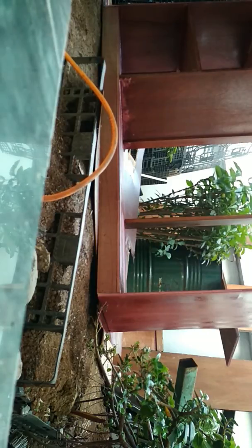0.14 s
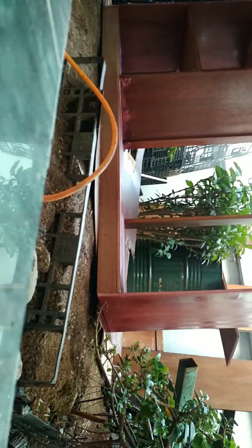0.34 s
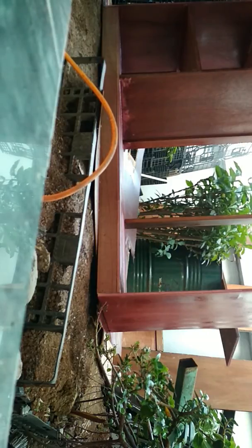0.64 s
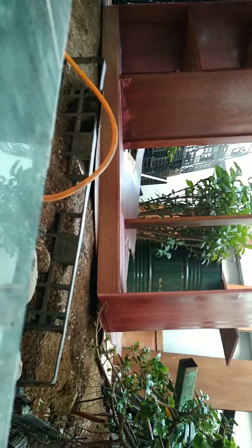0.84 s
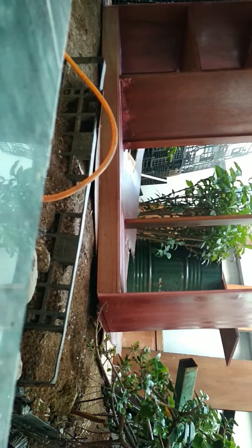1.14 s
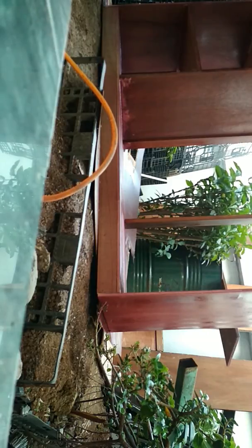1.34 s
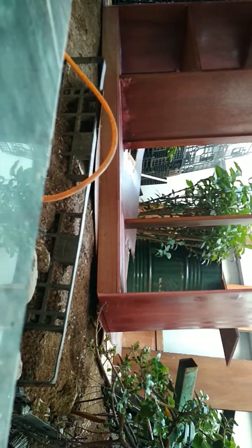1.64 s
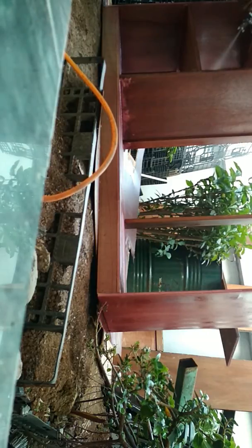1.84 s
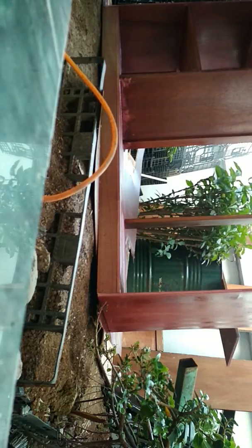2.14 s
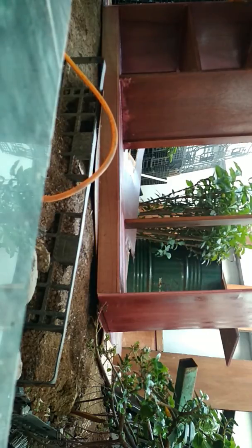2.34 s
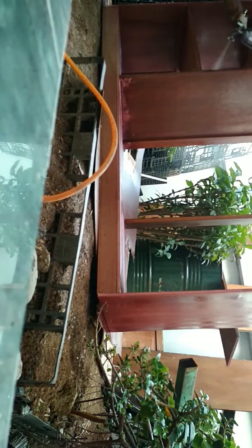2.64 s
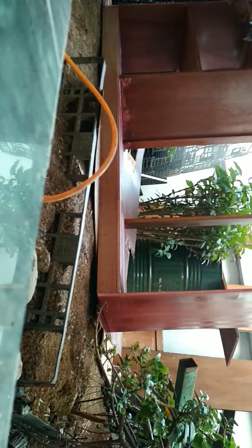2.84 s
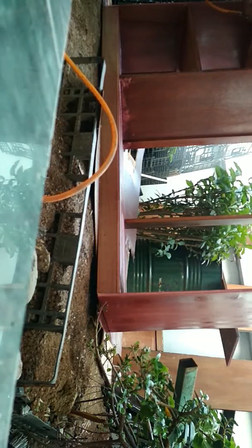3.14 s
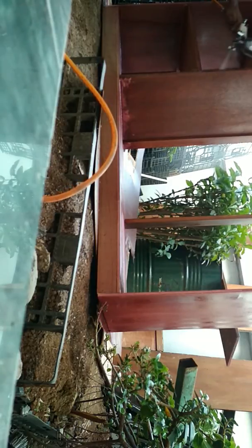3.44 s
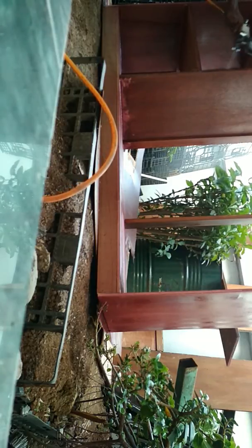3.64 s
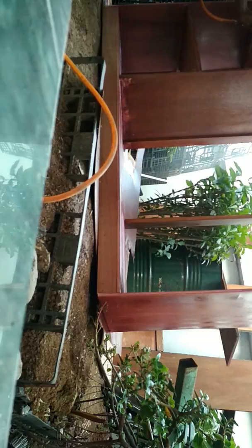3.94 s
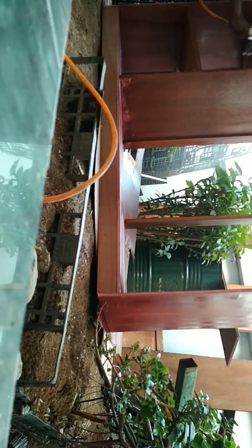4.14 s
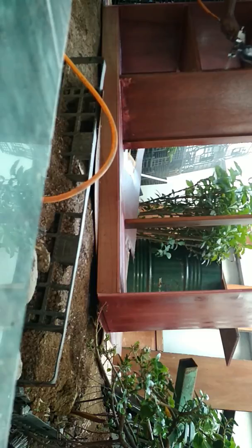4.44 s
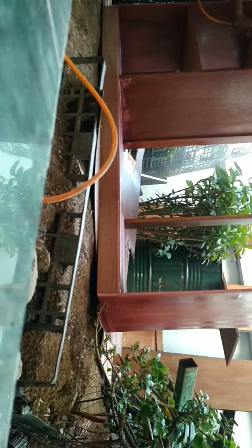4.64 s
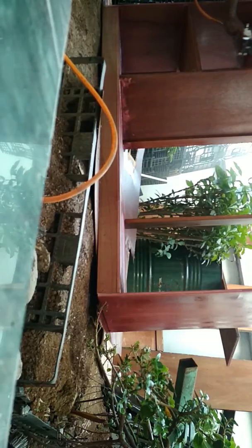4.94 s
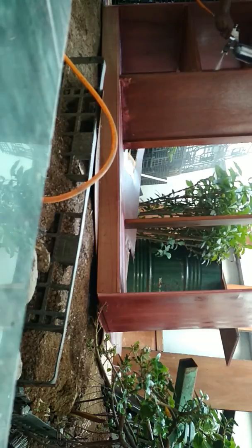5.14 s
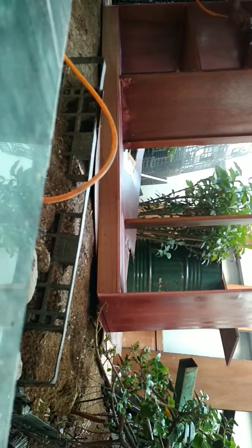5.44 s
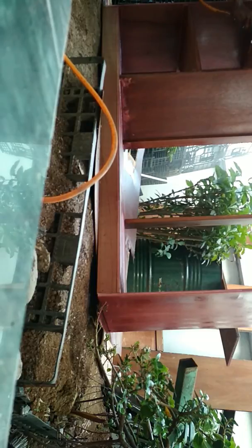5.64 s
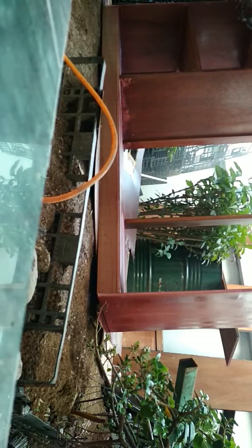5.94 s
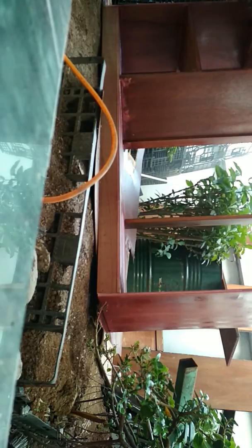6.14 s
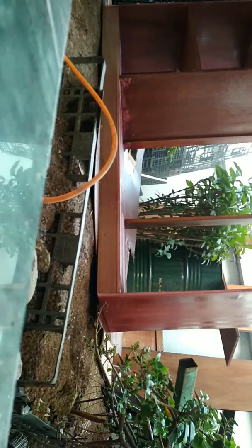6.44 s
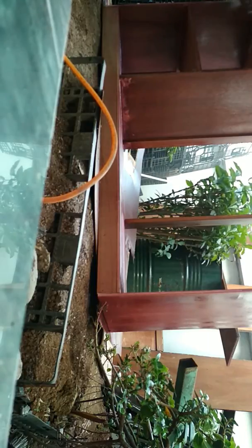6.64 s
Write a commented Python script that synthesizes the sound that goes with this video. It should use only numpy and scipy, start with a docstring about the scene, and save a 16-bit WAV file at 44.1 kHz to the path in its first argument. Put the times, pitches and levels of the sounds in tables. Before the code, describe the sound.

A steady motor-driven compressor putters about twenty-four times a second, its reed buzzing, valves knocking and air spitting in tiny sharp bursts, brighter on the right. Spray hiss with sputtering droplets opens the scene, cuts off, and returns late. Between the two sprays only the machine remains, with a small regular squeak that is clearest just after the first spray. The stereo microphone is nearby outdoors, catching soft wind rumble.

```python
"""A small piston air compressor runs steadily in a yard, right of the microphone, 24 strokes a second.
On each stroke its intake reed flutters as a gliding tone, valves clack and knock the tank's modes,
and bursts of noise spit air; a faint squeak comes round with the belt, over fan rush and motor tones.
A spray gun hisses twice as shaped noise with crackling droplets, and a light breeze rumbles on the microphone."""
import sys
import numpy as np
from scipy import signal
from scipy.fft import rfft, irfft, next_fast_len
from scipy.io import wavfile
from scipy.ndimage import map_coordinates

SR = 44100
rng = np.random.default_rng(int(sys.argv[2]) if len(sys.argv) > 2 else 0)


def unload_audio(sound):
    """Save the sound as a 16-bit wav file, at the path given as the first command line argument."""
    columns = np.transpose(np.atleast_2d(sound))
    # keep every value between -1 and 1, then stretch to whole-number steps
    steps = np.round(np.clip(columns, -1, 1) * 32767)
    wavfile.write(sys.argv[1], SR, steps.astype(np.int16))


N = 298557


def amp(db):
    """Decibels to gain."""
    return 10 ** (np.asarray(db) / 20)


def stereo_gain(left_db, right_db):
    """A column of gains for the left and right microphone ports."""
    return amp([[left_db], [right_db]])


def panned(right_db):
    """Gains that make the right port right_db louder than the left."""
    return stereo_gain(-right_db / 2, right_db / 2)


def unit(x):
    """x at rms 1."""
    return x / np.sqrt(np.mean(x ** 2) + 1e-20)


def clock():
    """The time of each sample in seconds."""
    return np.arange(N) / SR


def curve(rows):
    """(time_s, value) rows as one value per sample."""
    return np.interp(clock(), *np.transpose(rows))


def held(rows, edge_s):
    """(start_s, end_s, height) rows as one value per sample; each rises and falls over edge_s."""
    ramp = lambda s: np.clip((clock() - s) / edge_s + .5, 0, 1)
    return sum(height * (ramp(start) - ramp(end)) for start, end, height in rows)


def along(points, hz):
    """(freq_hz, value) points read on a log frequency axis."""
    point_hz, value = np.transpose(points)
    return np.interp(np.log(hz + 1), np.log(point_hz + 1), value)


def bell(t, centre, width):
    """A smooth bump of height 1."""
    return np.exp(-.5 * ((t - centre) / width) ** 2)


def wobble(rate):
    """A smooth random curve, rate knots a second."""
    knots = rng.standard_normal(int(N * rate / SR) + 4)
    return map_coordinates(knots, [clock() * rate])


def tone(hz, drift_hz, rate):
    """A sine of rms 1 whose pitch wanders, rate knots a second."""
    pitch_hz = hz + drift_hz * wobble(rate)
    return unit(np.sin(2 * np.pi * np.cumsum(pitch_hz) / SR))


def filtered(x, response):
    """x passed through a complex response of frequency."""
    m = next_fast_len(N + SR // 2)
    return irfft(rfft(x, m) * response(np.fft.rfftfreq(m, 1 / SR)), m)[..., :N]


def delayed(x, seconds):
    """x arriving later, or earlier if seconds is negative."""
    return filtered(x, lambda hz: np.exp(-2j * np.pi * hz * seconds))


# how alike noise is at the two ports: freq_hz, likeness (1 the same, 0 unrelated)
PORT_LIKENESS = [(150, 1), (500, 1), (1900, 0.82), (2600, 0.56), (4000, 0.61), (12000, 0.17)]


def rush(spectrum):
    """Stereo noise of rms 1, alike in the bass and largely unrelated in the treble."""
    def mid_side_colour(hz):
        turn = np.arccos(np.clip(along(PORT_LIKENESS, hz), -1, 1)) / 2
        return amp(along(spectrum, hz)) * [np.cos(turn), np.sin(turn)]
    mid, side = filtered(rng.standard_normal((2, N)), mid_side_colour)
    return unit(np.array([mid + side, mid - side]))


# gusts on the microphone: start_s, end_s, level_db
GUST_TIMES = [(.97, 1.04, -43), (1.04, 1.41, -47), (1.61, 1.74, -43), (3.35, 3.65, -52)]
# colour of the calm rumble: freq_hz, relative_density_db
RUMBLE_SPECTRUM = [(15, -67), (35, -3.5), (50, 0), (90, -1), (140, -5.5), (220, -15.5), (500, -17.5),
                   (3000, -84)]
# colour of the gusts: freq_hz, relative_density_db
BUFFET_SPECTRUM = [(20, -39), (45, 4), (70, 0), (150, -1.5), (230, -18), (800, -75)]


def breeze():
    """Moving air rumbles on the microphone, and a few light gusts buffet it."""
    calm_db, uneven_db, gust_edge_s = -54, 0.76, 0.028
    gusts = held([(start, end, amp(db)) for start, end, db in GUST_TIMES], gust_edge_s)
    calm = amp(calm_db + uneven_db * wobble(13))
    return calm * rush(RUMBLE_SPECTRUM) + gusts * rush(BUFFET_SPECTRUM)


# faint tones of the motor casing: pitch_hz, level_db
CASING_TONES = [(1020, -60.5), (1416, -78), (1970, -83), (3558, -88), (3898, -88)]


def casing():
    """The motor casing sings with faint tones, made hoarse by fast pitch drift."""
    waver_db, drift_hz = 1.5, 14
    return sum(amp(db + waver_db * wobble(28)) * tone(hz, drift_hz, 120) for hz, db in CASING_TONES)


# the motor's whine as it comes and goes: time_s, level_db
WHINE_LEVEL = [(.2, -78), (.45, -71), (.6, -78), (.78, -69), (1.05, -77), (1.3, -74), (1.45, -85),
               (1.6, -78), (2.05, -85), (2.3, -77), (2.8, -80), (3.25, -74), (3.4, -80), (3.5, -73),
               (3.9, -76.5), (4.27, -69), (4.55, -77), (5.3, -74.5), (5.5, -80), (5.8, -69), (6.1, -69),
               (6.65, -81)]


def motor():
    """The motor whines faintly, slightly unsteady in level and pitch."""
    whine_hz, waver_db, drift_hz = 2379, 2, 13
    return amp(curve(WHINE_LEVEL) + waver_db * wobble(17)) * tone(whine_hz, drift_hz, 60)


# clean tones of the fan shroud: pitch_hz, left_db, right_db
SHROUD_TONES = [(577, -72, -65), (610, -68, -59), (939, -68, -66), (1012, -66, -62), (1029.5, -71, -62),
                (1290, -69, -80)]


def shroud():
    """The fan shroud hums with a few nearly steady tones."""
    drift_hz = 0.51
    return sum(stereo_gain(left, right) * tone(hz, drift_hz, 4.4) for hz, left, right in SHROUD_TONES)


# colour of the fan's air: freq_hz, relative_density_db
FAN_SPECTRUM = [(60, -39), (150, -42), (210, -3), (320, -8.5), (550, -5), (850, -3), (1150, -0.5),
                (1450, 0), (1750, -2), (2050, -3), (2300, -12), (2700, -10.5), (2950, -19), (3900, -14.5),
                (5800, -21.5), (8000, -20.5), (16000, -100)]


def fan():
    """The cooling fan rushes evenly, as steady broadband noise."""
    return amp(-56) * rush(FAN_SPECTRUM)


# pulls on the spray gun's trigger, half way or fully: pressed_s, let_go_s, pull (0-1)
TRIGGER_PULLS = [(-.1, .36, 0.25), (.36, 1.435, 0.85), (5.54, 5.68, 0.53), (5.68, 6.37, 0.92),
                 (6.37, 6.9, 0.45)]


def trigger_pull():
    """How far the trigger is pulled, 0 to 1, moving over a short travel time."""
    travel_s = 0.012
    return np.clip(held(TRIGGER_PULLS, travel_s), 0, 1)


# sharp sputters of the spray gun: time_s, relative_level_db
SPUTTER_TIMES = [(.412, -45), (.437, -49), (.482, -45), (.52, -55), (.562, -45), (.748, -51), (.783, -54),
                 (.808, -51), (1.064, -48), (1.084, -54), (1.21, -52), (5.681, -44), (5.709, -51),
                 (5.772, -55), (5.81, -50), (5.845, -49), (5.888, -50), (5.931, -54), (5.971, -51),
                 (6.103, -50), (6.184, -46), (6.226, -48), (6.392, -49)]
# colour of the spray: freq_hz, relative_density_db
SPRAY_SPECTRUM = [(1200, -5), (2400, 2.5), (3000, 1.5), (3700, 5), (5000, -3), (6200, -6), (7500, -2.5),
                  (12000, -4)]


def spray(age, trigger):
    """The pulled gun hisses, surging late in each stroke; droplets crackle and the largest sputter out."""
    t = clock()
    level_db, clump_db, grain_db = -61.0, 2.2, 3.2
    surge_db, surge_s, surge_width_s = 3, .037, .004
    surge = surge_db * bell(age, surge_s, surge_width_s)
    unevenness = clump_db * wobble(90) + grain_db * wobble(400)
    hiss = amp(level_db + surge + unevenness) * trigger

    # droplets start at random, far more often on a full pull
    full_pull_ticks_per_s, tick_db, tick_spread_db, tick_decay_s = 120, -51, 2, .0006
    starts = rng.random(N) < full_pull_ticks_per_s / SR * trigger ** 3
    drops = starts * amp(tick_db + tick_spread_db * rng.standard_normal(N))
    ticks = signal.lfilter([1], [1, -np.exp(-1 / (tick_decay_s * SR))], drops)

    # each sputter starts at once and dies away
    sputter_db, sputter_decay_s = -7, 0.016
    sputters = sum(amp(db + sputter_db) * (t >= s) * np.exp(-abs(t - s) / sputter_decay_s)
                   for s, db in SPUTTER_TIMES)
    # the three levels combine as powers and shape one noise
    return np.sqrt(hiss ** 2 + ticks ** 2 + sputters ** 2) * rush(SPRAY_SPECTRUM)


LAP_S = .27  # one lap of the belt

# how hard the belt slips: time_s, relative_level_db
SLIP_LEVEL = [(.1, -56), (.65, -56), (.97, -52), (1.25, -51), (1.5, -42.5), (1.78, -43.5), (2.03, -45),
              (2.3, -49), (2.55, -53), (3.6, -50.5), (3.9, -55), (5.8, -54.5), (6.38, -49.5), (6.65, -48)]
# laps on which the belt rasps: time_s, level_db
RASP_TIMES = [(.17, -60), (1.51, -49.5), (1.82, -51), (2.05, -60), (6.35, -57), (6.63, -52.5)]
# colour of the rasp: freq_hz, relative_density_db
RASP_SPECTRUM = [(1050, -36), (1200, -11), (1290, 7), (1370, -6), (1700, -13), (2500, -70)]


def belt():
    """The belt squeaks once a lap as a wavering tone, with a noisy rasp on some laps."""
    count, first_s, squeak_width_s, rasp_width_s = 26, .14, 0.054, 0.062
    squeak_hz, drift_hz, level_db, uneven_db = 1174, 1, -3, .8
    times = first_s + LAP_S * np.arange(count)
    levels = np.interp(times, *np.transpose(SLIP_LEVEL)) + uneven_db * rng.standard_normal(count)
    slip = sum(amp(db) * bell(clock(), s, squeak_width_s) for s, db in zip(times, levels))
    squeak = amp(level_db) * slip * tone(squeak_hz, drift_hz, 25.1)
    rasp = sum(amp(db) * bell(clock(), s, rasp_width_s) for s, db in RASP_TIMES)
    return squeak + rasp * rush(RASP_SPECTRUM)


# colour of the loose parts: freq_hz, relative_density_db
RATTLE_SPECTRUM = [(300, -20), (520, -6), (600, 4), (720, -1), (870, -1), (1000, 5), (1090, -3),
                   (1500, -28), (2500, -48)]


def rattle(age):
    """Loose parts shiver all through the turn, renewed once a stroke and fading only slightly."""
    level_db, renewed_s, decay_s = -62.5, 0.0061, 0.76
    since = (age - renewed_s) % age.max()
    return amp(level_db) * np.exp(-since / decay_s) * rush(RATTLE_SPECTRUM) * panned(right_db=3)


# air spitting through the valves: time_into_stroke_s, width_s, relative_level_db
SPIT_TIMES = [(.0026, .0007, 0), (.005, .0007, -9.5), (.0084, .001, -11.5), (.0115, .0009, -16),
              (.0163, .0005, -17), (.0187, .0005, -7), (.031, .0012, -12.5)]
# colour of the spits: freq_hz, relative_density_db
SPIT_SPECTRUM = [(3000, -19.5), (7000, -28), (9000, -9), (10000, -14.5), (10700, 6), (11500, -6),
                 (12100, 3), (13000, -10), (13700, -4), (15700, -4)]
# colour of the fizz: freq_hz, relative_density_db
FIZZ_SPECTRUM = [(3820, -99), (6500, -22), (7010, -17.5), (8530, -14), (9190, -5.5), (10200, -4),
                 (11400, 3.5), (13400, 0), (15100, 3.5), (15800, -21), (16000, -16)]


def valves(age, trigger):
    """Air spits through the valves over a fizz; in the two hisses spits stand out more, the fizz is quieter."""
    spit_db, hiss_spit_db, uneven_db = -44.0, 6, 1
    gate = sum(amp(db) * bell(age, s, width) for s, width, db in SPIT_TIMES)
    spit_level = amp(spit_db + hiss_spit_db * trigger + uneven_db * wobble(24))
    spits = spit_level * gate * rush(SPIT_SPECTRUM) * panned(right_db=10.5)

    # during the hisses the fizz is quieter and uneven, with one dip in each stroke
    fizz_db, quieter_db, flicker_db = -49.0, -5.0, 1.5
    dip_db, dip_s, dip_width_s = -5, .025, .003
    hiss_fizz_db = quieter_db + dip_db * bell(age, dip_s, dip_width_s) + flicker_db * wobble(200)
    fizz_level = amp(fizz_db + hiss_fizz_db * trigger ** 2)
    fizz = fizz_level * rush(FIZZ_SPECTRUM) * panned(right_db=2.0)
    return spits + fizz


# valve knocks (reed opens, reed shuts, outlet opens): time_into_stroke_s, relative_level_db
KNOCK_TIMES = [(.00093, 0), (.02046, -7.1), (.03, -5.6)]
# tank and casing modes: pitch_hz, width_hz, relative_left_db, relative_right_db
TANK_MODES = [(186.8, 160, -57.3, -58.2), (177.9, 116.5, -57.7, -57.7), (389.7, 38.3, -43.2, -44.7),
              (387.3, 46.7, -42.2, -43.1), (490.2, 12, -61.1, -60.3), (314.6, 12, -90, -60.8),
              (595.8, 14.9, -56.5, -51.4), (621.1, 12, -63.1, -51.9), (724.1, 20.9, -47.9, -46.4),
              (722.4, 11.9, -46.4, -45.9), (856.5, 39, -71.5, -90), (909.4, 12, -72.5, -68.4),
              (1027.4, 24.1, -61, -46.7), (1026.7, 19.7, -62.6, -46.6), (1172.3, 85, -64.2, -60.4),
              (1184.4, 89, -65.1, -60.8), (1411, 12, -71.1, -81.4)]


def tank(age):
    """The knocks of the valves ring the resonant modes of the tank and casing."""
    contact_s = .00003
    blows = sum(amp(db) * bell(age, s, contact_s) for s, db in KNOCK_TIMES)
    # scaled so that the first knock alone averages 1
    blows = blows / np.mean(bell(age, KNOCK_TIMES[0][0], contact_s))

    def modes(f):
        total = 0
        for k, (centre, width, left, right) in enumerate(TANK_MODES):
            damping = 1j * f * width
            resonance = damping / (centre * centre - f * f + damping)
            total = total + (-1) ** k * stereo_gain(left, right) * resonance  # signs alternate
        return total
    return filtered(blows, modes)


# dull clacks of the reed, valves and connecting rod:
# time_into_stroke_s, pitch_hz, ring_s, relative_left_db, relative_right_db
CLACK_TIMES = [(.00079, 414, .00078, -60, -38.4), (.01769, 571, .00114, -50.1, -37.8),
               (.01806, 940, .00085, -40.6, -42.1), (.02755, 909, .00184, -42.7, -46.2),
               (.03194, 917, .004, -70, -53.5), (.03903, 872, .00183, -45, -40.6),
               (.04119, 416, .00097, -36.7, -32.4)]


def clacks(age):
    """Each clack swells and dies within a few cycles; they come in the same order on every stroke."""
    def clack(start_s, hz, ring_s, left, right):
        since = (age - start_s) % age.max()
        swell = since / ring_s * np.exp(1 - since / ring_s)
        return -stereo_gain(left, right) * np.sin(2 * np.pi * hz * since) * swell
    return sum(clack(*row) for row in CLACK_TIMES)


# tones of the intake reed: multiple_of_pitch, relative_left_db, relative_right_db
REED_TONES = [(1, -27.2, -30.2), (2, -50.2, -36.4)]


def reed(age):
    """The intake reed flutters while the piston draws air, sagging in pitch; a wall sends it back."""
    opens_s, length_s, rise_s, fall_s = .00071, .01736, .00015, .00341
    start_hz, end_hz, sag_s, skew_rad = 381.3, 324.1, .00442, -1.7
    echo_s, echo_db = .02546, -14.8
    since = np.maximum(age - opens_s, 0)
    lift = np.clip(since / rise_s, 0, 1) * np.clip((length_s - since) / fall_s, 0, 1)
    # the pitch glides exponentially from start_hz towards end_hz
    cycles = end_hz * since + (start_hz - end_hz) * sag_s * (1 - np.exp(-since / sag_s))
    phase = 2 * np.pi * cycles
    # the reed swings lopsidedly against its seat, which adds the octave
    swing = sum(stereo_gain(left, right) * np.sin(k * phase + (k - 1) * skew_rad)
                for k, left, right in REED_TONES)
    flutter = -lift * swing
    return flutter + amp(echo_db) * delayed(flutter, echo_s)


def pump(age):
    """The intake filter muffles the chug; clacks and knocks differ a little from stroke to stroke."""
    level_db, uneven_db, clack_db, knock_db = 0.32, 0.17, 1, .6
    muffle_hz, lowest_hz = 1600, 10
    uneven_clacks = clacks(age) * amp(clack_db * wobble(24))
    uneven_knocks = tank(age) * amp(knock_db * wobble(12))
    parts = reed(age) + uneven_clacks + uneven_knocks
    chug = parts * amp(level_db + uneven_db * wobble(12))
    return filtered(chug, lambda hz: (hz > lowest_hz) / (1 + (hz / muffle_hz) ** 12))


# crank speed: time_s, turns_per_s
CRANK_SPEED = [(0, 24.027), (2, 24.015), (3.5, 24.03), (6.8, 24.033)]


def crank():
    """Seconds since the present stroke began; the belt's stiff joint rocks the timing once a lap."""
    first_stroke_s, sway_s, drift_s = .0271, .00003, .00004
    speed = curve(CRANK_SPEED)
    # the timing also drifts slowly at random
    sway = sway_s * np.sin(2 * np.pi * clock() / LAP_S) + drift_s * wobble(1.55)
    turns = np.cumsum(speed) / SR - (first_stroke_s + sway) * speed[0]
    return turns % 1 / speed


def scene():
    """The compressor stands to the right, so the right port hears it first; gun and gusts come and go."""
    lead_s, spread_hz = .00025, 1000
    age, trigger = crank(), trigger_pull()
    left, right = fan() + shroud() + belt() + rattle(age) + valves(age, trigger)
    chug_left, chug_right = pump(age)

    # the pump's upper tones spread from the whole tank and reach both ports together
    def bass_lead(hz):
        return np.exp(2j * np.pi * hz * lead_s / (1 + (hz / spread_hz) ** 6))
    chug_right = filtered(chug_right, bass_lead)
    machine = np.array([left + chug_left, delayed(right, -lead_s) + chug_right])
    return breeze() + casing() + motor() + spray(age, trigger) + machine


def record(dry):
    """The recorder keeps nothing above its band limit."""
    top_hz = 15780
    return filtered(dry, lambda hz: hz < top_hz)


dry = scene()
out = record(dry)
unload_audio(out)
```